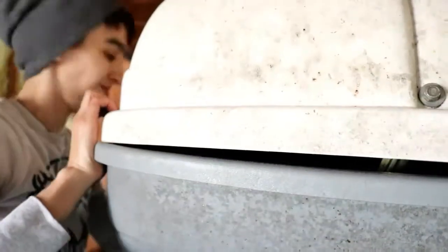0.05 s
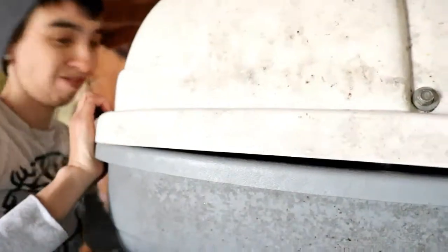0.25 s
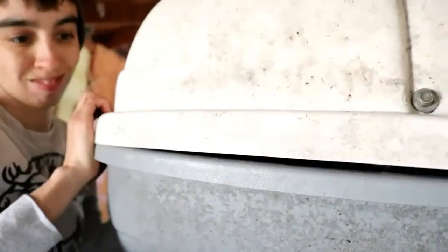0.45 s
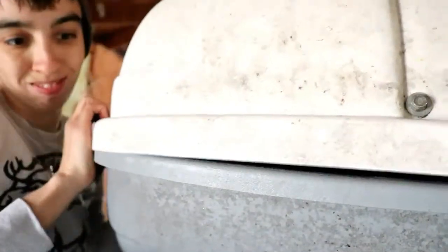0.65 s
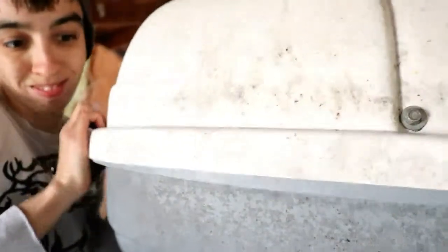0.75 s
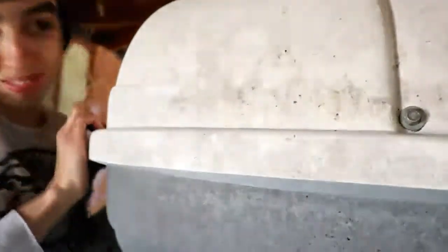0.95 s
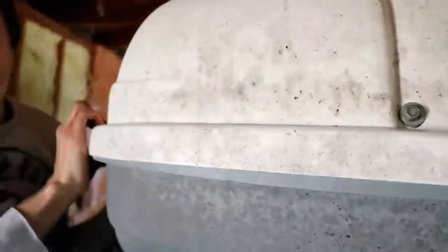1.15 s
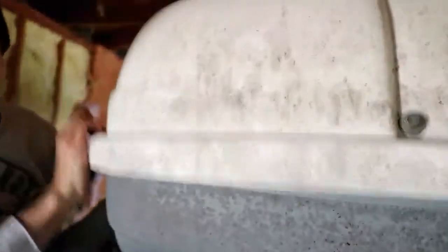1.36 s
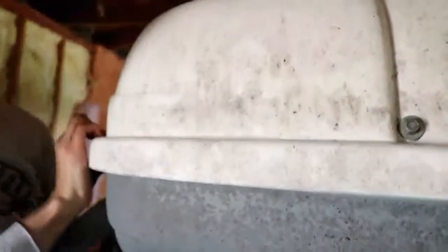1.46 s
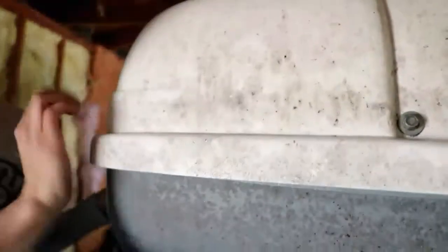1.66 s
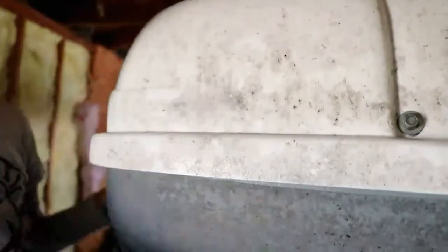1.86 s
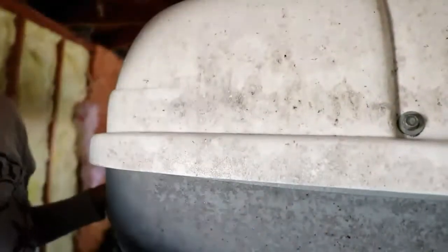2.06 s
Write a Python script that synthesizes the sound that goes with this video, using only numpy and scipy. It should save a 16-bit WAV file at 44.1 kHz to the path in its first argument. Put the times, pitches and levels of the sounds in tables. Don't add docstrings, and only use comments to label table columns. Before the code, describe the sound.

Close to a small camera microphone in a still garage, a plastic box lid bumps and rubs, thunks home with a hollow boom, scrapes lightly, then is slapped crisply before the hand drags away.

```python
import sys
import numpy as np
from scipy import signal
from scipy.io import wavfile
from scipy.ndimage import uniform_filter1d

SR = 44100
rng = np.random.default_rng(int(sys.argv[2]) if len(sys.argv) > 2 else 0)


def wrap_up_sound(samples):
    columns = np.atleast_2d(samples).T
    tamed = np.clip(columns, -1, 1)
    steps = np.round(tamed * 32767).astype(np.int16)
    wavfile.write(sys.argv[1], SR, steps)


def boost(x):
    u = np.asarray(x, float) / 20
    return 10 ** u


N = 92610

# hz, level_db (per Hz)
AIR_COLOUR = [(15, 3), (25, 4.5), (166, 1.5), (624, -8.5), (796, -7), (863, -7.5), (2410, -19), (2610, -20),
              (16000, -26)]
AIR_DB = -55.5
HUM_HZ, HUM_DB = 64.3, -62

# start_s, rise_s, hold_s, fall_t60_s, level_db
RIM_SCRAPES = [(.11, 0.0065, 0.011, 0.96, -53), (.14, 0.085, 0.012, .2, -44),
               (1.11, 0.0042, 0.015, 0.16, -47), (.205, 0.038, 0.012, 0.095, -30.5),
               (.41, 0.01, 0.047, 0.35, -46.5), (.468, 0.013, 0.061, 0.11, -29.5),
               (1.481, 0.0017, 0.021, 0.17, -26.5), (.564, 0.0014, 0.0046, 0.12, -27),
               (.6, 0.007, 0.089, 0.51, -44.5), (.797, 0.0013, 0.0081, 0.23, -20.5),
               (1.18, 0.019, 0.019, 0.33, -32.5), (1.195, 0.034, 0.03, 0.17, -27),
               (1.32, 0.014, 0.35, 0.58, -50)]
# hz, level_db (per Hz)
SCRAPE_COLOUR = [(18, -49), (30, -26.5), (355, 3.5), (600, -1.5), (866, -5.5), (1250, -6), (1760, -15.5),
                 (2800, -23.5), (16000, -72.5)]
# start_s, rise_s, hold_s, fall_t60_s, level_db
LID_RUMBLES = [
    (.13, 0.096, 0.0045, 0.55, -33),
    (.35, 0.0033, 0.005, 0.35, -38.5),
    (.665, 0.0046, 0.016, 0.45, -37),
    (.74, 0.074, 0.0026, 0.21, -24),
    (.797, 0.0049, 0.038, 0.59, -30),
    (.89, 0.0086, 0.024, 0.4, -32.5),
    (1.11, 0.0045, 0.063, 0.94, -45),
    (1.62, 0.051, 0.042, 0.39, -46.5),
]
# hz, level_db (per Hz)
RUMBLE_COLOUR = [(18, -53), (30, -12), (266, -2.5), (426, -14.5), (760, -16.5), (1220, -20), (1860, -25.5),
                 (3400, -30.5), (16000, -92)]
# start_s, rise_s, hold_s, fall_t60_s, level_db
GRIT_RUBS = [
    (.19, 0.042, 0.028, 0.057, -45.5),
    (.68, 0.012, .01, 0.058, -53.5),
    (.47, 0.021, 0.027, 0.22, -45),
    (.8, 0.01, 0.04, 0.06, -46),
    (1.185, 0.0023, 0.013, 0.13, -47),
    (1.2, 0.023, 0.026, 0.075, -45),
    (1.484, 0.0021, 0.0099, 0.17, -33.5),
]
# hz, level_db (per Hz)
GRIT_COLOUR = [(800, 2), (2300, 5), (3500, 0), (5000, -5.5), (7000, -13.5), (11000, -16), (16000, -19)]
# start_s, rise_s, hold_s, fall_t60_s, level_db
PALM_SLIDES = [
    (.47, 0.011, 0.059, 0.093, -38.5),
    (.57, .005, 0.028, 0.13, -43),
    (.89, 0.014, 0.0078, 0.45, -45.5),
    (1.482, 0.0023, 0.008, 0.24, -20.5),
    (1.5, 0.067, 0.1, 0.49, -30),
    (1.6, 0.04, 0.04, 0.4, -36),
]
# hz, level_db (per Hz)
PALM_COLOUR = [(30, -26), (100, -8.5), (170, -0.5), (250, -3), (900, -10.5), (3300, -20), (5300, -30),
               (7000, -43), (16000, -67)]
# pitch_hz, width_hz, level_db (over the plain colour)
SHELL_MODES = [(107.4, 11, 19), (170, 112, 12), (258, 75, 5.5), (377, 55, 9.5), (480, 41, 6.5),
               (640, 110, 4), (680, 150, 2), (945, 150, 11), (1210, 114, 12.5), (2300, 270, 5)]

# hz, t60_s
ROOM_DECAY = [(100, 0.42), (500, 0.18), (2000, 0.17), (8000, 0.14)]
ROOM_DB = -17

# start_s, level_db, t60_s, top_hz
LATCH_CLICKS = [
    (0.112, -50, 0.089, 3170),
    (0.3532, -47, 0.11, 4420),
    (0.4692, -38.5, 0.19, 3240),
    (0.5641, -37, 0.039, 5760),
    (0.785, -43, 0.097, 4500),
    (0.814, -39, 0.037, 6560),
    (0.8943, -46, 0.076, 3760),
    (1.113, -49.5, 0.061, 3400),
    (1.1853, -47.5, 0.073, 4400),
]
# start_s, level_db, t60_s, top_hz
LATCH_SNAPS = [(.1833, -54, .015, 8000), (.1938, -52, .015, 8000), (.2098, -44, .015, 9000),
               (.3345, -50, .015, 9000), (.376, -54, .02, 8000), (.9805, -48, .035, 8500),
               (.7972, -27, .014, 6800), (.7982, -17, .028, 4300), (.803, -26, .07, 3800),
               (1.4735, -23, .022, 15000), (1.4752, -15, .014, 12000), (1.4765, -18, .012, 6000),
               (.8295, -42, .025, 15000), (.8472, -33, .04, 3900), (.848, -46, .025, 13000),
               (.96, -54, .015, 9000)]
# pitch_hz, width_hz, level_db
LATCH_MODES = [(1300, 600, 1), (2200, 500, 3), (3100, 500, 2), (4000, 600, 0), (4950, 400, -1),
               (7500, 1200, -10), (13500, 1500, -12)]
# start_s, peak_db, pitch_hz, t60_s
SOFT_BUMPS = [
    (.2, -40, 60.5, 0.071),
    (.3, -43, 55, 0.045),
    (0.678, -25.5, 62, 0.054),
    (.92, -56, 45, .1),
    (1.657, -27.5, 55.3, 0.098),
    (1.752, -33.5, 33.3, 0.14),
]
# start_s, peak_db, pitch_hz, t60_s
SHELL_THUDS = [(.251, -10, 206, 0.015), (0.3138, -12.5, 169, 0.022), (0.329, -23.5, 170, 0.03),
               (0.6825, -15, 185, 0.023), (0.7934, -7.5, 146, 0.025), (0.8064, -7.5, 230, 0.019),
               (.82, -13, 233, 0.019), (0.8464, -15, 219, 0.054), (0.793, -14.5, 97.5, 0.049),
               (0.8137, -6, 263, 0.019), (0.839, -10, 212, 0.036), (.231, -18, 250, 0.019),
               (0.8265, -3.5, 241.6, 0.04), (0.925, -21.5, 170, 0.13), (1.4589, -12.5, 170, 0.066)]
# start_s, peak_db, pitch_hz, t60_s
PANEL_RINGS = [(0.224, -32.5, 1210, 0.067), (.357, -30, 399, 0.087), (0.421, -34, 214, 0.091),
               (.483, -23.5, 755, 0.14), (.525, -31, 598, 0.19), (.574, -29.5, 1042, 0.094),
               (.575, -32.5, 1254, 0.092), (.572, -31, 496, 0.085), (0.841, -17, 258, 0.1),
               (.806, -15, 390, .07), (.822, -17, 335, .09), (.81, -17, 150, .12), (1.481, -15, 285, .07),
               (1.0, -34, 215, .12), (1.113, -38.5, 442, 0.09), (1.26, -28.5, 480, 0.22),
               (1.474, -8.5, 377, 0.023)]
# start_s, length_s, from_hz, to_hz, level_db, overtone_db
SEAL_SQUEAKS = [
    (.6882, .0034, 6800, 5000, -41, -12),
    (.692, .004, 5400, 5300, -56, -30),
    (1.628, .03, 4680, 4640, -43, -40),
    (.26, .008, 7950, 7900, -56, -40),
]
# start_s, peak_db, pitch_hz, t60_s
STIFF_PINGS = [(1.4748, -14, 626, .02), (1.4752, -14.5, 1020, 0.02), (1.4755, -13.5, 1390, 0.015),
               (1.4752, -13.5, 2040, .016), (1.4757, -14, 2450, .013), (1.4753, -12, 2910, 0.017),
               (1.4756, -17, 3060, 0.015), (1.4754, -18, 3840, 0.012), (1.4753, -9, 4970, 0.012),
               (1.4757, -16.5, 5470, 0.01), (1.4757, -25.5, 7440, 0.0084), (1.4757, -31, 9000, 0.0072),
               (1.4745, -27, 19000, .014), (1.476, -31, 13100, .012), (1.4765, -17, 2650, .012),
               (1.484, -24, 3250, .06), (.565, -33, 2300, .04), (.568, -39, 3750, 0.034),
               (.7985, -15.5, 1253, 0.016), (.799, -18, 1570, 0.019), (.7975, -15, 2210, .015),
               (.799, -25, 2850, 0.02), (.7985, -22.5, 3100, 0.014), (.7978, -26, 4000, .016),
               (.7972, -32, 3200, 0.013)]


def evened(x):
    return x / np.sqrt(np.mean(x ** 2) + 1e-20)


def read(points, hz):
    f, value = np.transpose(points)
    return np.interp(np.log(hz + 1), np.log(f + 1), value)


def add(mix, start_s, sound):
    part = mix[round(start_s * SR):][:len(sound)]
    part += sound[:len(part)]


def colour(x, points):
    hz = abs(np.fft.fftfreq(8192, 1 / SR))
    log_gain = np.log(boost(read(points, hz)))
    response = np.exp(np.conj(signal.hilbert(log_gain)))
    taps = np.fft.ifft(response).real[:4096]
    return signal.oaconvolve(x, taps)[:len(x)]


def ring(x, modes):
    return sum(boost(db) * signal.lfilter(*signal.iirpeak(hz, hz / width, SR), x) for hz, width, db in modes)


def dying(t, peak_db, t60_s):
    return boost(peak_db - 60 * t / t60_s)


def air():
    hum_mode = [(HUM_HZ, 4, 0)]
    hum = ring(ring(rng.standard_normal(N), hum_mode), hum_mode)
    hum = hum / np.sqrt(uniform_filter1d(hum ** 2, size=6000))
    hiss = evened(colour(rng.standard_normal(N), AIR_COLOUR))
    return boost(AIR_DB) * hiss + boost(HUM_DB) * hum


def friction(strokes, spectrum, slips_per_s, spread_db, lumps_db, ring_db):
    strength = boost(spread_db * np.minimum(rng.exponential(size=N), 4))
    slips = rng.standard_normal(N) * strength * (rng.random(N) < slips_per_s / SR)
    wander = uniform_filter1d(rng.standard_normal(N), size=300)
    wander = uniform_filter1d(wander, size=300)
    slips = slips * boost(lumps_db * evened(wander))

    steady = colour(slips, spectrum)
    scale = 1 / np.std(steady + boost(ring_db) * ring(steady, SHELL_MODES))

    t = np.arange(N) / SR
    power = np.zeros(N)
    for start, rise, hold, fall, db in strokes:
        swell = np.clip((t - start) / rise, 0, 1) ** 4
        since_release = np.maximum(t - start - rise - hold, 0)
        power += swell * dying(since_release, db, fall) ** 2
    drive = colour(slips * np.sqrt(power), spectrum)
    return scale * (drive + boost(ring_db) * ring(drive, SHELL_MODES))


def rim_scrape():
    return friction(RIM_SCRAPES, SCRAPE_COLOUR, slips_per_s=9800, spread_db=0.5, lumps_db=0.5, ring_db=-17.5)


def garage(x):
    taps = np.zeros(SR // 2)
    at = np.arange(300, len(taps) - 20, 20)
    taps[at + rng.integers(0, 20, len(at))] = rng.choice([-1., 1.], len(at))
    hz, t, bands = signal.stft(taps, SR, nperseg=256)
    decay = boost(-60 * t / read(ROOM_DECAY, hz)[:, None])
    tail = signal.istft(bands * decay, SR, nperseg=256)[1]
    return signal.fftconvolve(x, tail / np.linalg.norm(tail))[:N]


def click(start_s, level_db, t60_s, top_hz):
    t = np.arange(0, .15, 1 / SR)
    noise = rng.standard_normal(len(t))
    lowpass = signal.butter(6, min(top_hz, SR / 2.2), fs=SR, output="sos")
    crack = signal.sosfilt(lowpass, boost(-12) * noise + ring(noise, LATCH_MODES))
    attack = np.minimum(t / (.0003 + .04 * t60_s), 1)
    return start_s, evened(crack) * attack * dying(t, level_db, t60_s)


def lid_rumble():
    return friction(LID_RUMBLES, RUMBLE_COLOUR, slips_per_s=4000, spread_db=2.5, lumps_db=1.0, ring_db=-12.5)


def grit_rub():
    return friction(GRIT_RUBS, GRIT_COLOUR, slips_per_s=9700, spread_db=0.5, lumps_db=1.0, ring_db=-10)


def thud(start_s, peak_db, pitch_hz, t60_s):
    t = np.arange(0, .15, 1 / SR)
    swing = -np.sin(2 * np.pi * pitch_hz * t * (1 - 4.9 * t))
    attack = np.minimum(t * pitch_hz * 2.28, 1)
    return start_s, swing * attack * dying(t, peak_db, t60_s)


def panel(start_s, peak_db, pitch_hz, t60_s):
    t = np.arange(0, .3, 1 / SR)
    attack = np.minimum(t / 0.0016, 1)
    return start_s, np.sin(2 * np.pi * pitch_hz * t) * attack * dying(t, peak_db, t60_s)


def squeak(start_s, length_s, from_hz, to_hz, level_db, overtone_db):
    t = np.arange(0, length_s, 1 / SR)
    glide_hz = from_hz + (to_hz - from_hz) * t / length_s
    shake = 1 + .05 * rng.standard_normal(len(t))
    turn = 2 * np.pi * np.cumsum(glide_hz * shake) / SR
    whistle = np.sin(turn) + boost(overtone_db) * np.sin(2 * turn)
    return start_s, boost(level_db) * np.sin(np.pi * t / length_s) * whistle


def palm_slide():
    return friction(PALM_SLIDES, PALM_COLOUR, slips_per_s=14000, spread_db=1.16, lumps_db=0.2, ring_db=-24.0)


def ping(start_s, peak_db, pitch_hz, t60_s):
    t = np.arange(0, .06, 1 / SR)
    attack = np.minimum(t / 0.00049, 1)
    return start_s, np.sin(2 * np.pi * pitch_hz * t) * attack * dying(t, peak_db, t60_s)


def slap():
    start_s, peak_db, pitch_hz, overtone_db = 1.4734, -10, 180, -4
    hold_s, t60_s = .0075, .014
    t = np.arange(0, .1, 1 / SR)
    turn = 2 * np.pi * pitch_hz * t
    swing = np.sin(turn) + boost(overtone_db) * np.sin(2 * turn)
    return start_s, swing * dying(np.maximum(t - hold_s, 0), peak_db, t60_s)


def scene():
    box = rim_scrape() + lid_rumble() + grit_rub() + palm_slide()
    struck = ((click, LATCH_CLICKS), (click, LATCH_SNAPS), (thud, SOFT_BUMPS), (thud, SHELL_THUDS),
              (panel, PANEL_RINGS), (squeak, SEAL_SQUEAKS), (ping, STIFF_PINGS))
    for source, events in struck:
        for event in events:
            add(box, *source(*event))
    add(box, *slap())
    mix = box + boost(ROOM_DB) * garage(box) + air()
    return mix[None]


def roll_off(x):
    return signal.sosfilt(signal.butter(12, 16360, fs=SR, output="sos"), x)


def record(dry):
    limit, edge_hz = .55, 15950
    limited = dry / (1 + abs(dry / limit) ** 6) ** (1 / 6)
    lowpass = signal.firwin(255, edge_hz, fs=SR)
    mix = signal.oaconvolve(limited, lowpass[None], "same")
    return roll_off(mix)


dry = scene()
out = record(dry)
wrap_up_sound(out)
```